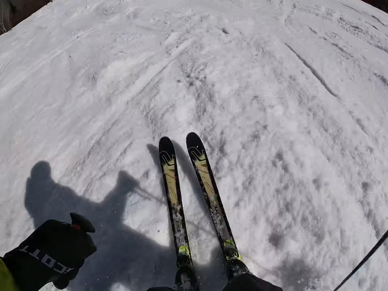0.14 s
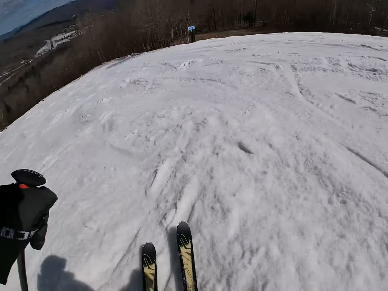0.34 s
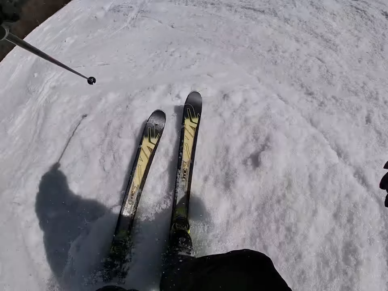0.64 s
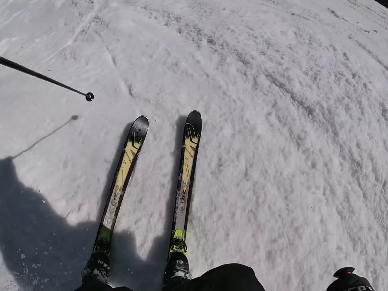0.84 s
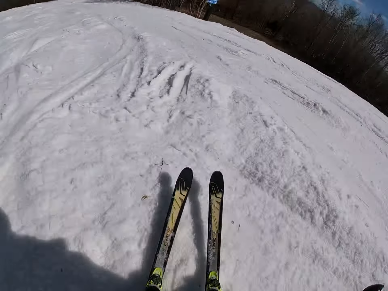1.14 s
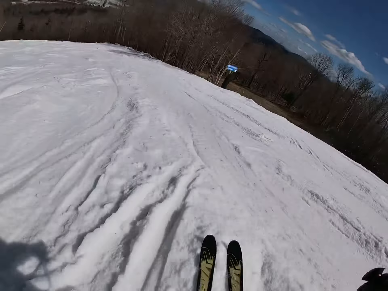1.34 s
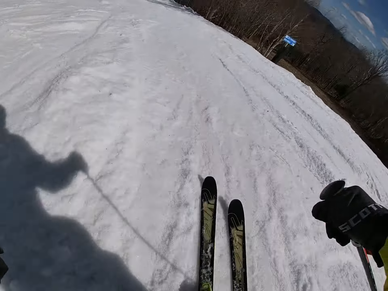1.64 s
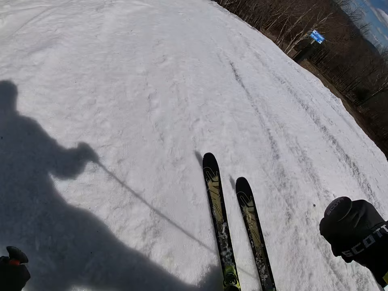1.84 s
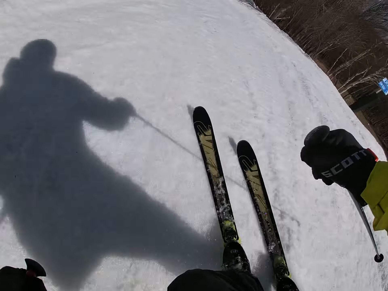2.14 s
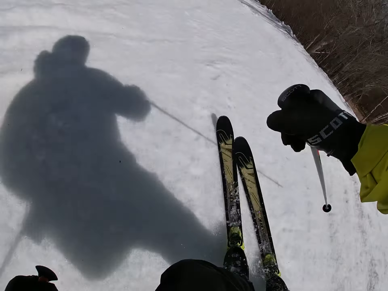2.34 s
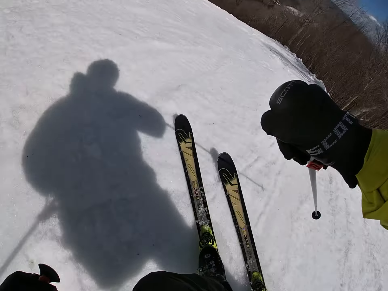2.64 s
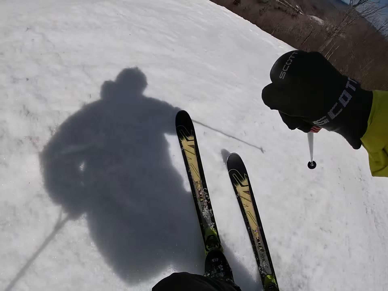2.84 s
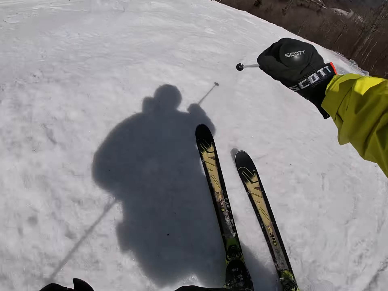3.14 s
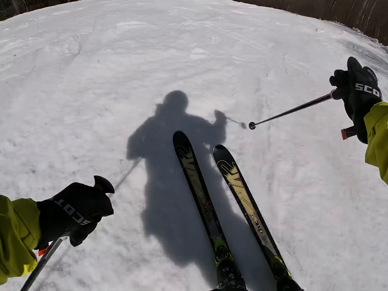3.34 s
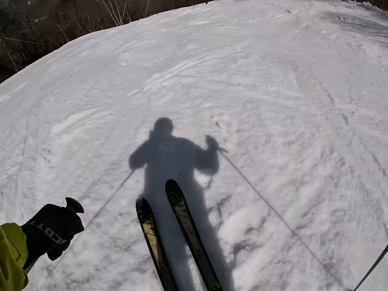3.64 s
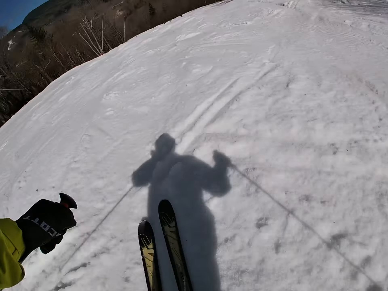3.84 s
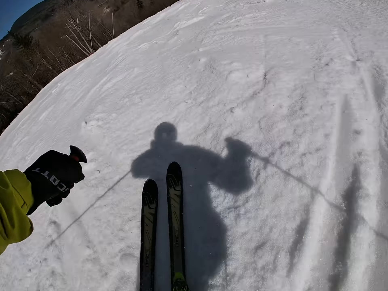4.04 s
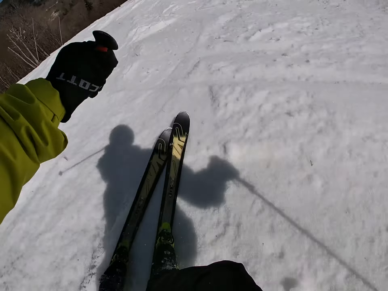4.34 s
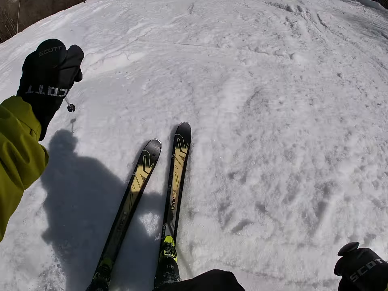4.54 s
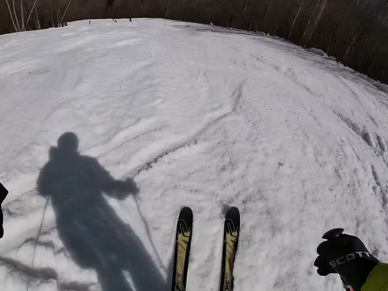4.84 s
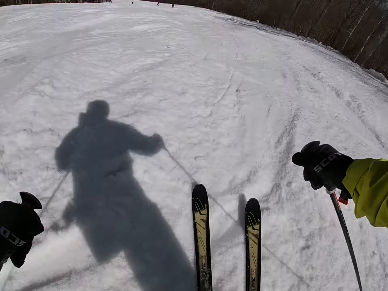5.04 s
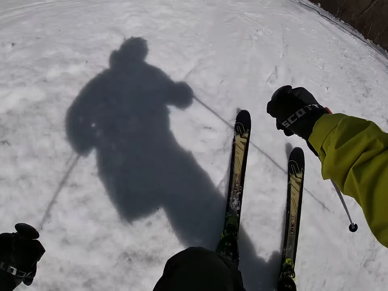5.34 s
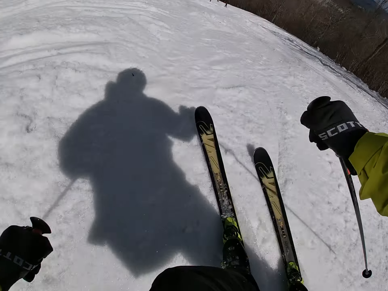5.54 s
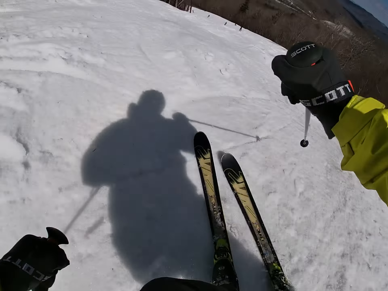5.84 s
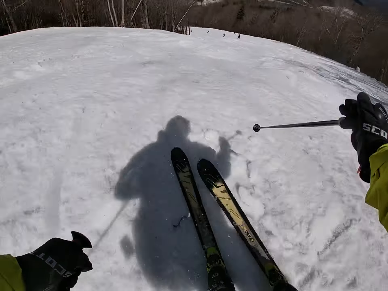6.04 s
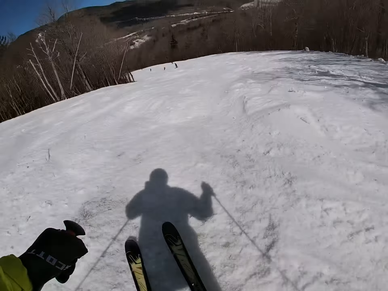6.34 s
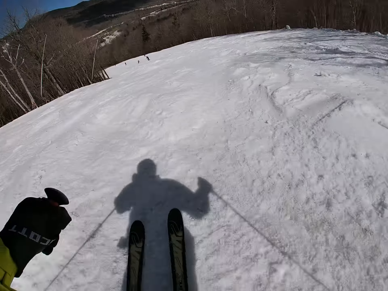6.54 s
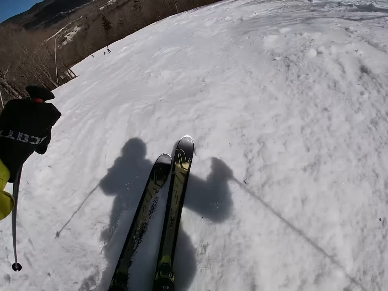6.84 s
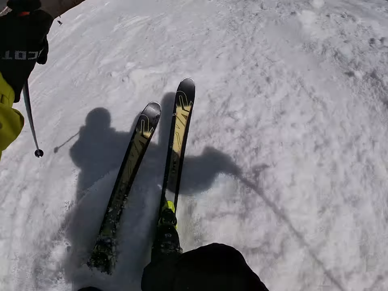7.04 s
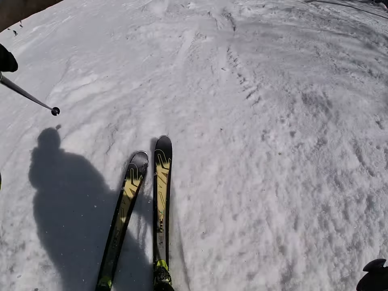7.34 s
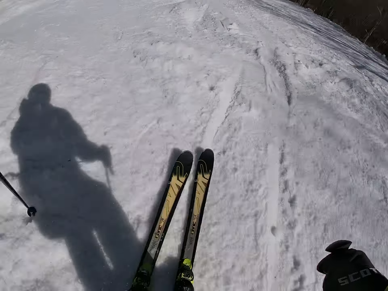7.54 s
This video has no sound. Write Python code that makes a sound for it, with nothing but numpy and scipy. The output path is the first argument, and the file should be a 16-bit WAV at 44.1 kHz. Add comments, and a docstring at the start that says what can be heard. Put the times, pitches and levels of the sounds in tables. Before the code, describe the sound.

Skis hiss and scrape through wet snow throughout, very close, with uneven wind rumbling on a chest-worn microphone. For the first two seconds the sound is lumpy and gritty, with short crunches of breaking clumps, brief dips near 0.4 and 1.3 seconds, and low thumps around 0.3, 1.2 and 1.6 seconds. From about 2 to 3.4 seconds comes a long, fuller scraping turn with a faint, high fizz of spray. The skis go light, then bite at 3.6 seconds with a thump and a hollow, throbbing mid-pitched note, which returns briefly at 4.5 seconds. Crunches cluster around 4.8 to 5.3 seconds. Strong low thumps hit near 6 seconds during another scraping turn. After a dip and more crunches at 6.4 seconds, the hollow note flutters until 7 seconds. A crunch and thump land at 7.2 seconds, with more bumps at the end, near 7.6 seconds.

```python
"""On a slope of wet spring snow, a skier carves turns with a microphone on the chest.
The edges throw hissing spray and the bases scrape and plough the slush: bands of noise that follow
the load on the skis. Breaking clumps crunch as damped impulses, and a hollow resonance sings near
1 kHz as some turns begin. Turbulent wind buffets the microphone, bumps under the skis shake it
with low thumps, and fine mist fizzes in the long turn."""
import sys
import numpy as np
from scipy import signal
from scipy.fft import rfft, irfft, next_fast_len
from scipy.io import wavfile
from scipy.ndimage import uniform_filter1d

SR = 44100
rng = np.random.default_rng(int(sys.argv[2]) if len(sys.argv) > 2 else 0)


def waveform_to_disk(signal):
    """Save audio, clipped to [-1, 1], as 16-bit WAV at the path in sys.argv[1]."""
    frames = np.transpose(np.atleast_2d(signal))
    scaled = np.clip(frames, -1, 1) * 32767
    samples = np.round(scaled).astype(np.int16)
    wavfile.write(sys.argv[1], SR, samples)


N = 338688

# Load on the skis through the turns: time_s, base_level_db, scrape_offset_db, plough_offset_db
SKI_LOAD = [(0.0, -30, -1, -22), (0.08, -28.5, -8, 0), (0.18, -29.5, -8.5, -11.5), (0.43, -27, -8, -8),
            (0.7, -25, -2.5, -17), (0.75, -28.5, -11, -12), (0.9, -32.5, 6, -5), (1.02, -28.5, 3.5, -7.5),
            (1.39, -32, -3, -4.5), (1.62, -27, 0, -13.5), (1.82, -28.5, 1.5, -3.5), (1.92, -22.5, 3.5, -10),
            (2.25, -28, 8, 7.5), (2.75, -27.5, 3, 5.5), (3.14, -28.5, 7, 1), (3.34, -30, 12, 6),
            (3.63, -39, 9.5, 2.5), (3.98, -31.5, 3, -3), (4.21, -29.5, 0.5, -11), (4.43, -24, 1.5, -8.5),
            (4.6, -28, 7.5, 0.5), (4.83, -34, -3, -2), (5.22, -26, 4.5, -6), (5.28, -32.5, 5.5, 1),
            (5.84, -26, 2, -13), (5.97, -29, 10, -2.5), (6.1, -32.5, 9, 1), (6.22, -34.5, 8, 2.5),
            (6.5, -37.5, 2, -4), (6.6, -30.5, 7.5, -3.5), (6.8, -23.5, 1, -5), (7.23, -33, 1, -12.5),
            (7.33, -29, 0.5, -11), (7.68, -38, 3.5, -9)]
# Snow underfoot: time_s, hiss_offset_db, lumpiness (0 to 1)
SNOW_TEXTURE = [(0, 0.5, 1), (.3, -10, 0.35), (1.0, -3.5, 0.57), (1.5, -3.5, 0.4), (2.0, -1.5, 0.3),
                (2.3, 0.5, 0.14), (3.0, 0, 0.28), (3.4, 4, 0.28), (3.8, -4.5, 0.4), (4.5, -2, 0.1),
                (5.0, -3, 1), (5.6, -1, 0.32), (6.2, 3, 0.55), (6.5, -10, 0.35), (7.0, -0.5, 0.45),
                (7.68, -2.5, 0.2)]
# Spectra of the four bands of ski noise: frequency_hz, relative_density_db
SPRAY_SPECTRUM = [(900, -4.5), (2000, -1), (2600, -4), (3070, -2), (3700, -7), (5000, -40)]
HISS_SPECTRUM = [(2800, -37), (3900, -1.5), (5290, -1), (6300, -8.5), (7620, -18.5), (9480, -17.5),
                 (11000, -27.5), (12500, -32.5), (14000, -43), (15600, -70)]
SCRAPE_SPECTRUM = [(450, -8), (750, 3), (1030, 5.5), (1450, 3), (2100, -5.5), (3500, -15)]
PLOUGH_SPECTRUM = [(140, -14), (235, -0.5), (330, -2.5), (520, -0.5), (800, -2), (1500, -44)]
# Boost or cut of the ski noise above 7.5 kHz: time_s, gain_db
TREBLE_GAIN = [(0, -7), (1.2, -1.5), (1.7, 4), (2.3, -3), (3.2, -3.5), (3.7, 2.5), (6.7, -2), (7.68, 4)]
# The skis go light, long at edge changes, briefly over ruts: bite_s, fade_s, float_s, spray_change_db
UNWEIGHTINGS = [(0.416, .25, 0.057, -13), (.865, 0.11, 0.022, 1), (1.381, 0.25, 0.12, -14),
                (1.591, 0.032, 0.023, -2), (2.168, 0.0079, 0.0078, -4.5), (2.215, 0.013, 0.0096, -7),
                (3.614, 0.35, 0.026, -10.5), (4.51, .01, 0.035, -4.5), (4.815, 0.21, 0.038, -8.5),
                (6.407, 0.19, 0.018, -10.5)]
# Heaps of slush in the skis' path: middle_s, length_s, swell_db
SLUSH_HEAPS = [(0.581, 0.069, 3.5), (0.628, 0.031, 4.5), (0.699, 0.033, 2.5), (0.897, 0.032, 6),
               (0.983, 0.052, 4.5), (1.414, 0.027, 4), (1.534, .03, 3.5), (1.79, 0.022, 5),
               (5.036, 0.04, 4), (5.476, 0.033, 4), (6.218, .035, 3.5), (6.427, 0.027, 6)]
# Clumps breaking: start_s, level_db, pitch_hz, brightness_db
CLUMP_BREAKS = [(0.377, -20, 1700, -4), (0.411, -16, 1550, -20), (0.4698, -12, 1430, -25),
                (0.4844, -10.5, 1700, -25), (0.865, -12.5, 910, -8), (1.036, -23.5, 1090, 15.5),
                (1.166, -15.5, 805, -12), (1.3886, -15, 1810, -3), (1.6316, -9.5, 1310, -3),
                (1.67, -10.5, 1150, -21), (3.628, -15.5, 1480, -7), (4.8193, -18, 1010, -30),
                (4.8369, -8, 1110, -20), (4.918, -19, 2000, -17), (4.933, -16, 600, -15),
                (4.979, -8.5, 1690, -4.5), (5.276, -14, 1480, -4), (6.403, -16, 1600, -12),
                (6.4256, -12.5, 2150, -7), (6.451, -19, 1500, -13), (6.478, -25, 3200, -7),
                (7.1823, -13.5, 840, 3)]
# Packets of the hollow note: start_s, length_s, level_db, first_hz, last_hz, width_hz (wider is rougher)
NOTE_PACKETS = [(2.74, 0.22, -28, 1070, 1030, 320), (3.609, 0.13, -19, 1130, 1110, 190),
                (3.703, 0.073, -19, 1030, 1030, 60), (3.769, 0.073, -20, 1033, 1030, 60),
                (3.855, 0.077, -26, 1080, 1130, 90), (4.449, 0.026, -18, 990, 975, 240),
                (4.506, 0.1, -28, 1010, 1040, 240), (6.49, 0.095, -24, 1007, 1050, 130),
                (6.575, 0.14, -27, 1050, 1090, 110), (6.663, 0.085, -22.5, 1050, 1010, 110),
                (6.746, 0.12, -26, 1010, 1020, 200), (6.931, 0.11, -28.5, 1020, 1000, 130)]
# Steady buffeting: time_s, level_db, tilt_db (favours flutter above 100 Hz over the rumble below)
BUFFETING = [(0, -24.5, 1.5), (.45, -30.5, -1.5), (1.3, -30, 1), (1.6, -23.5, -7), (1.97, -23, 2.5),
             (2.16, -31, 4), (2.67, -38.5, 0), (3.2, -27.5, 1), (3.55, -38, 3), (3.9, -41, -15.5),
             (4.5, -33, 1), (5.0, -29, 0.5), (5.35, -25.5, -3.5), (5.52, -25, -2.5), (5.6, -29.5, -1),
             (5.75, -34, -1.5), (6.5, -33.5, -7.5), (7.1, -34, -2), (7.68, -36, 0.5)]
# Low thumps as bumps under the skis shake the microphone: middle_s, length_s, swell_db, added_tilt_db
LOW_THUMPS = [(0.286, 0.11, 10.5, -3.5), (1.15, 0.091, 10.5, 2), (1.42, 0.11, 4, -1.5),
              (1.61, 0.16, 7, 3.5), (3.207, 0.026, 6, 8), (3.64, 0.18, 16.5, 8), (4.016, 0.14, 8.5, 2),
              (4.384, 0.098, 5, -1), (4.617, 0.17, 6, -6), (4.945, 0.059, 9, 3), (5.896, 0.21, 16.5, 3.5),
              (6.022, 0.11, 18, 4), (6.32, 0.11, 5.5, 10), (7.19, .17, 16, 4), (7.55, 0.091, 11.5, -6),
              (7.65, 0.062, 13.5, -5)]
# Spectrum of the eddies: frequency_hz, relative_density_db
EDDY_SPECTRUM = [(8.8, -34), (15, 1.5), (60, 0), (162, -5), (258, -12), (378, -17), (445, -20.5),
                 (650, -43), (1100, -120)]
# Finest spray reaching the microphone: time_s, level_db
MIST_LEVEL = [(2.3, -77), (2.9, -53), (3.2, -67), (3.55, -65), (3.8, -88)]


def skis():
    """Friction and crushing: clumps and grains of snow modulate the amplitude of four noise bands."""
    pile_up, clump_rise_s = 0.77, 0.0071  # wet snow gives way gradually
    growl_hz, growl_width_hz, growl_drift = 406, 250, 0.15  # a hollow in the ploughed slush
    base_db, scrape_db, plough_db = curves(SKI_LOAD)
    hiss_db, lumpiness = curves(SNOW_TEXTURE)
    load_db = unweighting_db() + heap_swell_db()
    clumps = jolts(per_s=70, spread_db=3.1, fade_s=0.010)
    grains = jolts(per_s=260, spread_db=8.1, fade_s=0.0013)
    clumps = clumps + pile_up * clumps[::-1]  # reversed jolts build up, then break off
    clumps = uniform_filter1d(clumps, size=int(clump_rise_s * SR))
    out = np.zeros(N)
    for spectrum, offset_db, clump_share, grain_share in (
            (SPRAY_SPECTRUM, load_db - 2.0, 0.7, 0.75),
            (HISS_SPECTRUM, 0.99 * load_db + hiss_db - 4.5, 0.5, 0.55),
            (SCRAPE_SPECTRUM, 0.89 * load_db + scrape_db, 0.6, 0.55),
            (PLOUGH_SPECTRUM, 0.8 * load_db + plough_db, 0.3, 0.4)):
        band_clumps = uniform_filter1d(jolts(per_s=83, spread_db=4.8, fade_s=0.002), size=180)
        crush = 1 + lumpiness * (clump_share * (clumps + 0.36 * band_clumps) + grain_share * grains)
        crush /= np.sqrt(uniform_filter1d(crush ** 2, size=SR // 8))  # lumps alter texture, not level
        noise = rng.standard_normal(N) * crush
        if spectrum is PLOUGH_SPECTRUM:
            pitch_hz = growl_hz * (1 + growl_drift * np.tanh(wander(0.1)))
            noise = noise + 2 * resonate(noise, pitch_hz, growl_width_hz)
        out += coloured(noise, spectrum) * gain_of(base_db + offset_db)
    treble = signal.sosfiltfilt(signal.butter(3, 7500, "high", fs=SR, output="sos"), out)
    out += (gain_of(curves(TREBLE_GAIN)[0]) - 1) * treble
    chatter_db = 1.22 * lumpiness * wander(0.0089)  # the skis bounce over ruts
    return patchy(out, depth_db=1.24) * gain_of(chatter_db)


def unweighting_db():
    """Friction noise follows load: it fades as the skis go light and returns as the edges bite."""
    t, bite_rise_s = np.arange(N) / SR, 0.0043
    total_db = np.zeros(N)
    for bite_s, fade_s, float_s, change_db in UNWEIGHTINGS:
        corners_s = [bite_s - float_s - fade_s, bite_s - float_s, bite_s, bite_s + bite_rise_s]
        total_db += change_db * np.interp(t, corners_s, [0, 1, 1, 0])
    return total_db


def heap_swell_db():
    """Added resistance: the noise swells while the skis push through each heap."""
    t = np.arange(N) / SR
    return sum(swell_db * np.clip(2 - 4 * abs(t - middle_s) / length_s, 0, 1)
               for middle_s, length_s, swell_db in SLUSH_HEAPS)


def crunches():
    """Impulse excitation: each breaking clump gives a heavily damped ring and a bright snap."""
    rings, snaps, t = np.zeros(N), np.zeros(N), np.arange(3000) / SR
    rise_s, relative_width = 0.0025, 0.78
    envelope = np.minimum(t / rise_s, 1) * (np.exp(-t / 0.0034) + 0.36 * np.exp(-t / 0.0079))
    for start_s, level_db, pitch_hz, brightness_db in CLUMP_BREAKS:
        snap = rng.standard_normal(len(t)) * envelope
        width_hz = relative_width * pitch_hz
        ring = resonate(resonate(snap, pitch_hz, width_hz), pitch_hz, width_hz)
        at = round(start_s * SR)
        rings[at:at + len(t)] += gain_of(level_db) * ring / abs(ring).max()
        snaps[at:at + len(t)] += gain_of(level_db + brightness_db) * snap / abs(snap).max()
    dull = signal.sosfilt(signal.butter(4, 4500, fs=SR, output="sos"), rings)
    bright = resonate(resonate(snaps, 3100, 2100), 5200, 2550) + 0.063 * resonate(snaps, 12500, 3000)
    return dull + signal.sosfilt(signal.butter(6, 11500, fs=SR, output="sos"), 2 * bright)


def hollow_note():
    """Forced resonance: noise drives a narrow band near 1 kHz, which throbs in short packets."""
    out, throb = np.zeros(N), gain_of(1.5 * wander(0.008))
    for start_s, length_s, level_db, first_hz, last_hz, width_hz in NOTE_PACKETS:
        at, n = round(start_s * SR), round(length_s * SR)
        drive = rng.standard_normal(SR // 2)[:n]
        pitch_hz = np.linspace(first_hz, last_hz, n)
        tone = resonate(resonate(drive, pitch_hz, width_hz), pitch_hz, width_hz) * throb[at:at + n]
        out[at:at + n] += unit_rms(tone) * gain_of(level_db) * signal.windows.tukey(n, alpha=0.6)
    return out


def wind_and_thumps():
    """Turbulence and vibration: eddies rumble on the microphone; the bass swells as bumps shake it."""
    t, ramp_share = np.arange(N) / SR, 0.65  # part of a thump spent rising and falling
    turbulence = rng.standard_normal(N) * gain_of(1.64 * wander(0.025) + 1.7 * wander(0.013))
    eddies = coloured(turbulence, EDDY_SPECTRUM)
    rumble = signal.sosfiltfilt(signal.butter(2, 100, fs=SR, output="sos"), eddies)
    flutter = eddies - rumble
    level_db, tilt_db = curves(BUFFETING)
    for middle_s, length_s, swell_db, added_tilt_db in LOW_THUMPS:
        thump = np.clip((1 - 2 * abs(t - middle_s) / length_s) / ramp_share, 0, 1)
        level_db += swell_db * thump
        tilt_db += added_tilt_db * thump
    tilt = gain_of(tilt_db / 2)
    return (rumble / tilt + flutter * tilt) * gain_of(level_db)


def mist():
    """Shot noise: the finest spray reaches the microphone as a thin fizz near 12 kHz."""
    fizz = rng.standard_normal(N) * (1 + 0.6 * jolts(per_s=400, spread_db=4.0, fade_s=0.001))
    return coloured(fizz, [(9500, -36), (12000, -5), (15500, -20)]) * gain_of(curves(MIST_LEVEL)[0])


def jolts(per_s, spread_db, fade_s):
    """Poisson process: random impulses, a few of them large, each decaying exponentially; rms 1."""
    sizes = gain_of(spread_db * np.minimum(rng.exponential(1, N), 2.5))
    impulses = sizes * (rng.random(N) < per_s / SR)
    return unit_rms(signal.lfilter([1], [1, -np.exp(-1 / (fade_s * SR))], impulses))


def wander(span_s):
    """Moving averages smooth noise into a drift that changes over about span_s; rms 1."""
    size = int(span_s * SR)
    return unit_rms(uniform_filter1d(uniform_filter1d(rng.standard_normal(N), size), size))


def patchy(x, depth_db):
    """Random modulation: louder and softer patches over time and frequency."""
    spectra = signal.stft(x, nperseg=512, noverlap=384)[2]
    patches = uniform_filter1d(rng.standard_normal(spectra.shape), size=6, axis=0)
    patches = unit_rms(uniform_filter1d(patches, size=14, axis=1))
    return signal.istft(spectra * gain_of(depth_db * patches), nperseg=512, noverlap=384)[1][:N]


def resonate(x, pitch_hz, width_hz):
    """Resonance by heterodyning: shift pitch_hz down to zero, low-pass, and shift back."""
    carrier = np.exp(2j * np.pi * np.cumsum(pitch_hz * np.ones(len(x))) / SR)
    pole = np.exp(-np.pi * width_hz / SR)
    return 2 * (carrier * signal.lfilter([1 - pole], [1, -pole], x / carrier)).real


def coloured(x, spectrum):
    """Spectral shaping: filter x by the table, falling 40 dB an octave past both ends; rms 1."""
    frequency_hz, density_db = np.transpose(spectrum)
    size = next_fast_len(N)
    octaves, table_octaves = np.log2(np.fft.rfftfreq(size, 1 / SR) + 1), np.log2(frequency_hz)
    outside = abs(octaves - np.clip(octaves, table_octaves[0], table_octaves[-1]))
    response = gain_of(np.interp(octaves, table_octaves, density_db) - 40 * outside)
    return unit_rms(irfft(rfft(x, size) * response, size)[:N])


def curves(rows):
    """Linear interpolation of each column after time_s, at every sample."""
    time_s, *columns = np.transpose(rows)
    return [np.interp(np.arange(N) / SR, time_s, column) for column in columns]


def gain_of(db):
    """Decibels to an amplitude ratio."""
    return 10 ** (np.asarray(db) / 20)


def unit_rms(x):
    """Normalisation to rms 1."""
    return x / np.sqrt(np.mean(x ** 2) + 1e-20)


def scene():
    """Superposition: all sources add at one microphone, which feeds both channels."""
    return np.tile(skis() + mist() + hollow_note() + crunches() + wind_and_thumps(), (2, 1))


def record(dry):
    """Band limiting: a steep low-pass filter removes the highest treble."""
    cutoff_hz = 15650
    low_pass = signal.firwin(511, cutoff_hz, window=("kaiser", 9), fs=SR)
    return signal.oaconvolve(dry, low_pass[None], "same")


dry = scene()
out = record(dry)
waveform_to_disk(out)
```